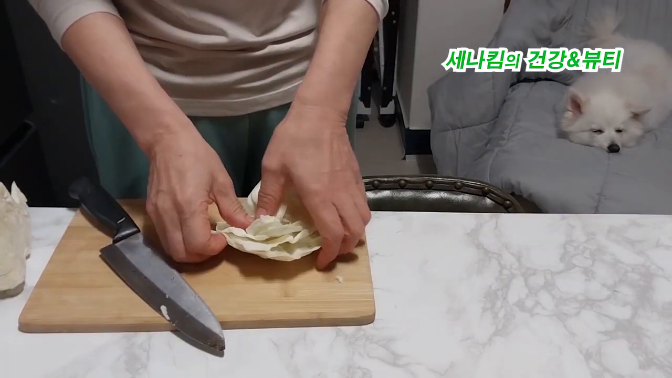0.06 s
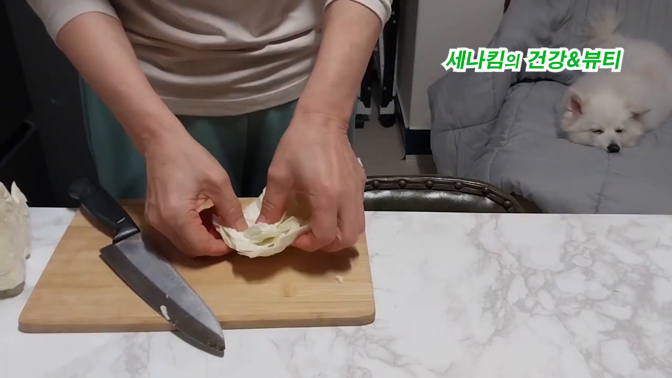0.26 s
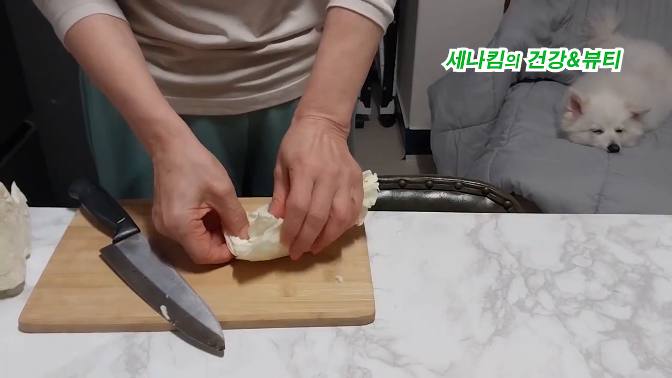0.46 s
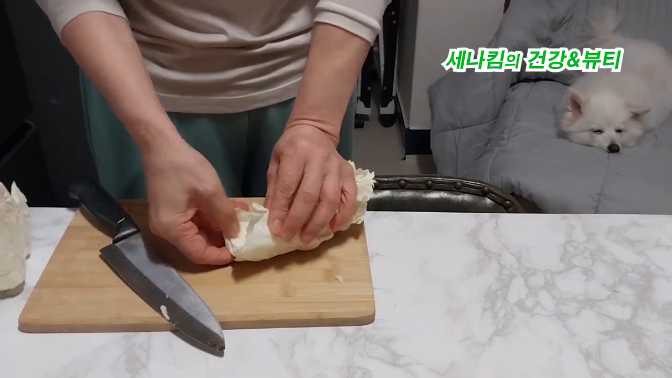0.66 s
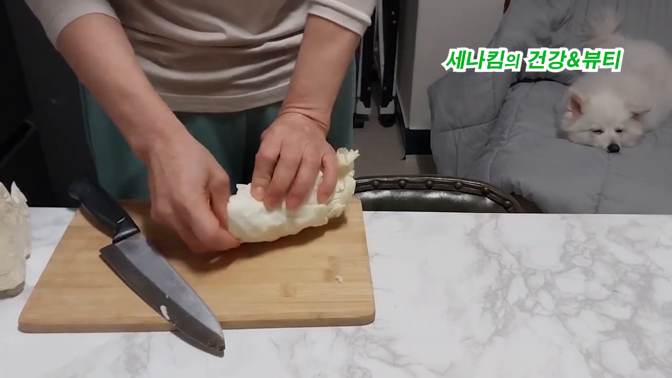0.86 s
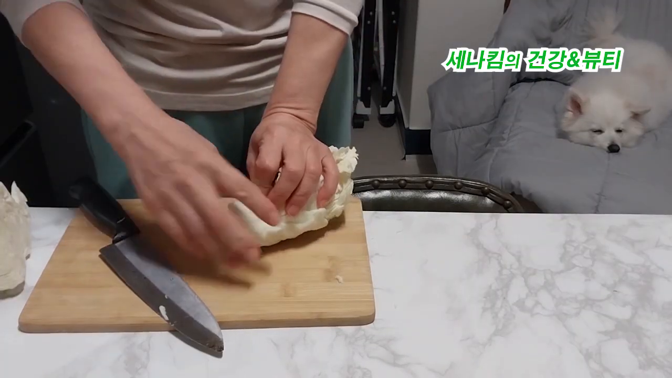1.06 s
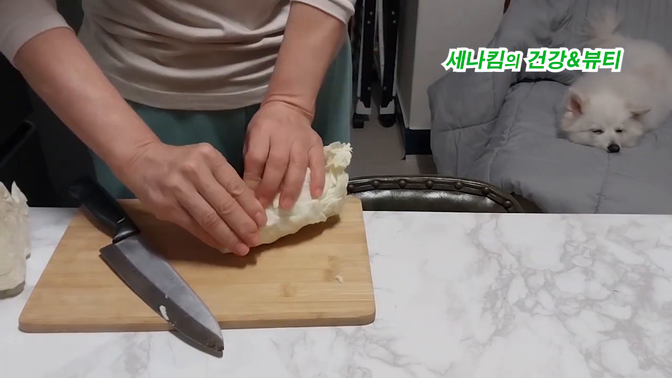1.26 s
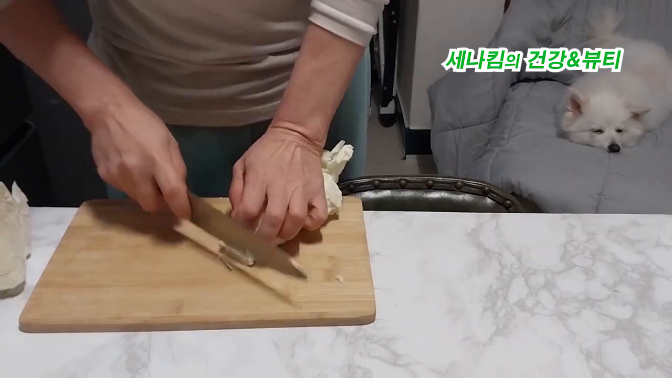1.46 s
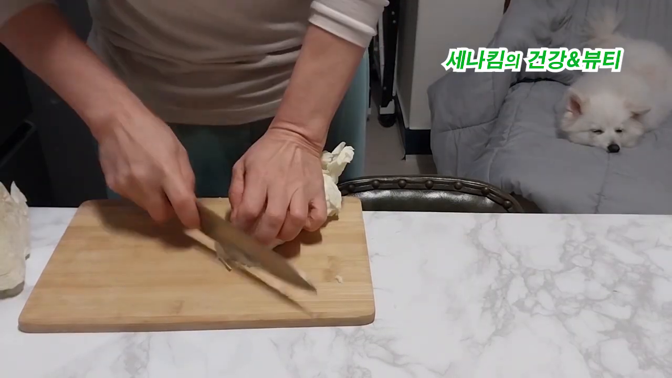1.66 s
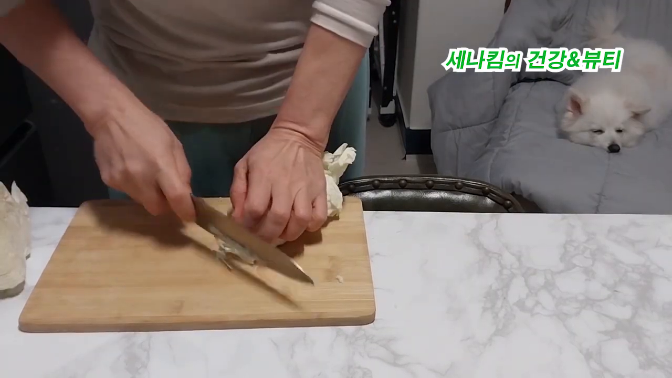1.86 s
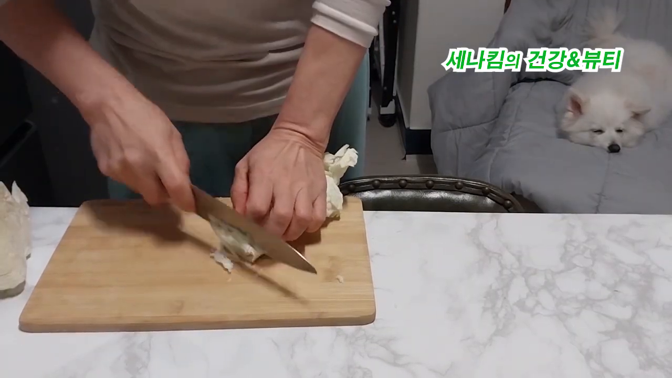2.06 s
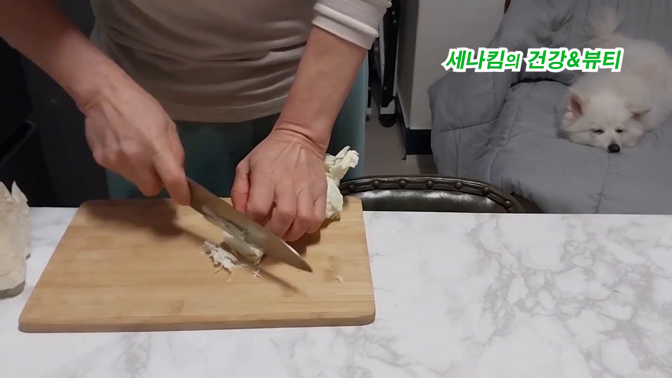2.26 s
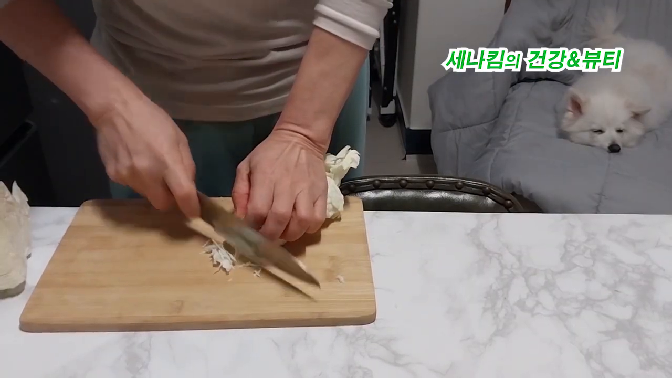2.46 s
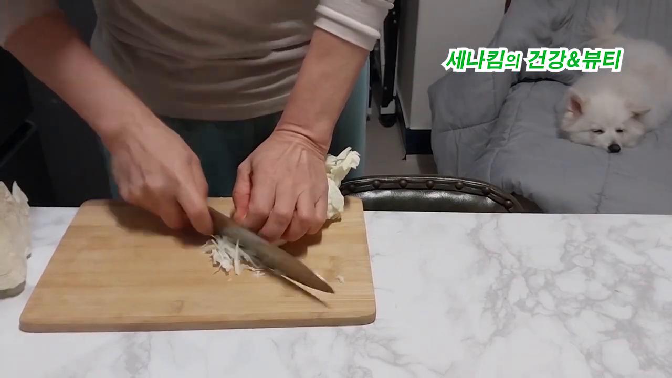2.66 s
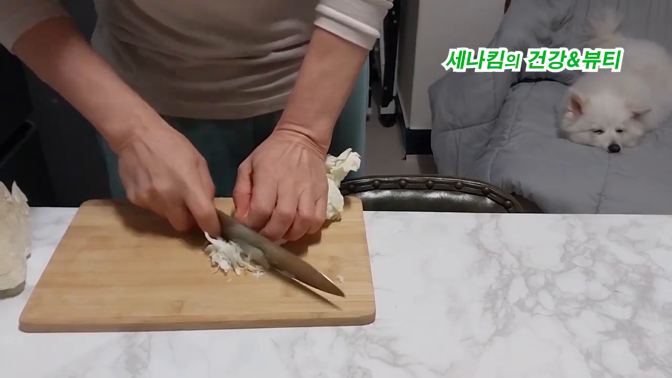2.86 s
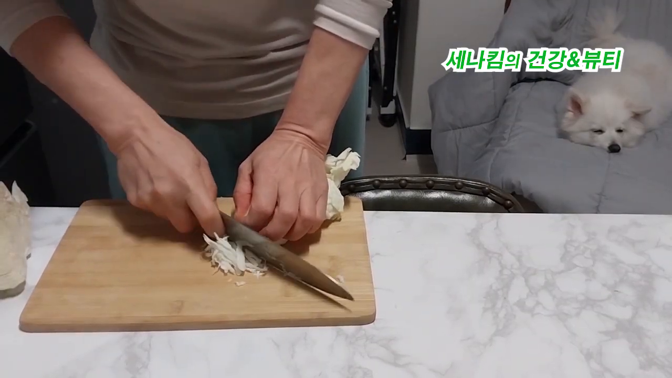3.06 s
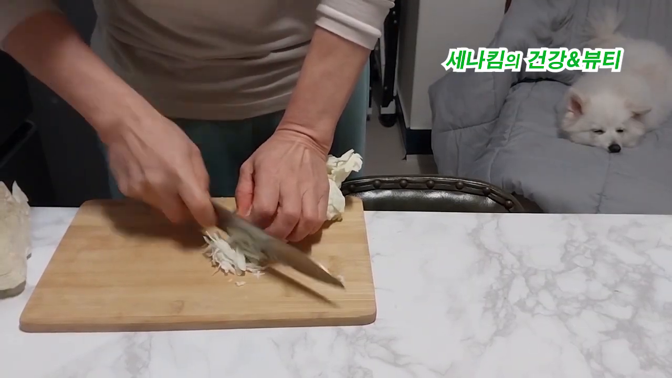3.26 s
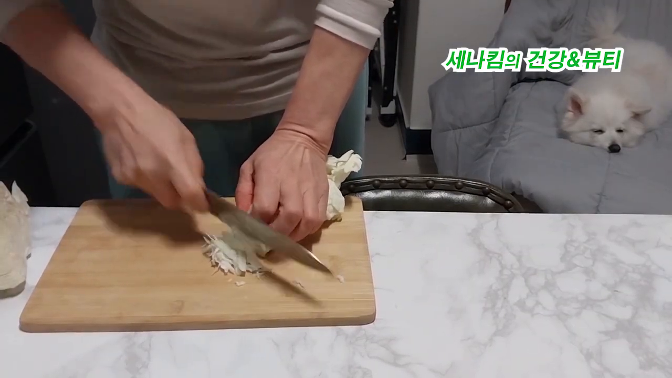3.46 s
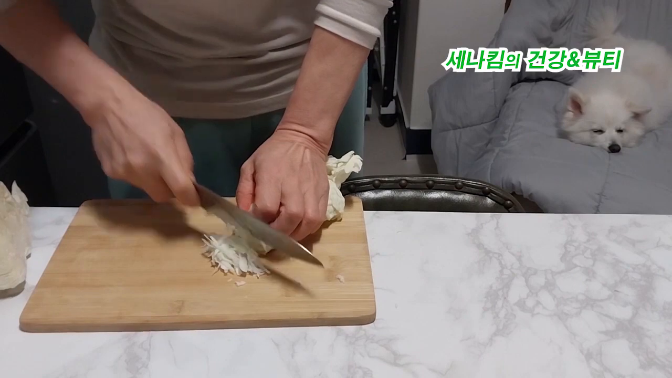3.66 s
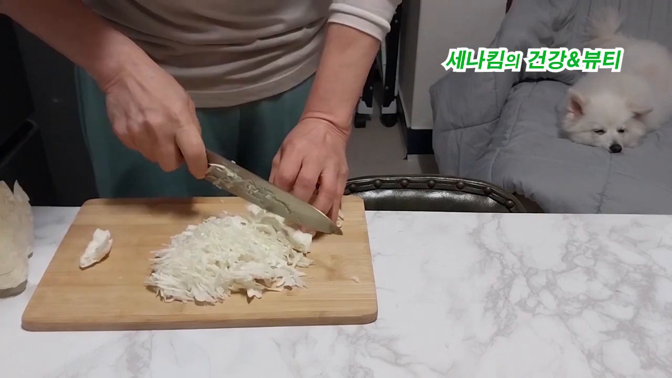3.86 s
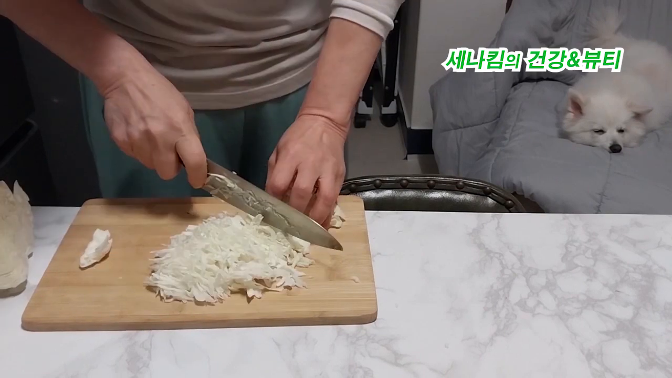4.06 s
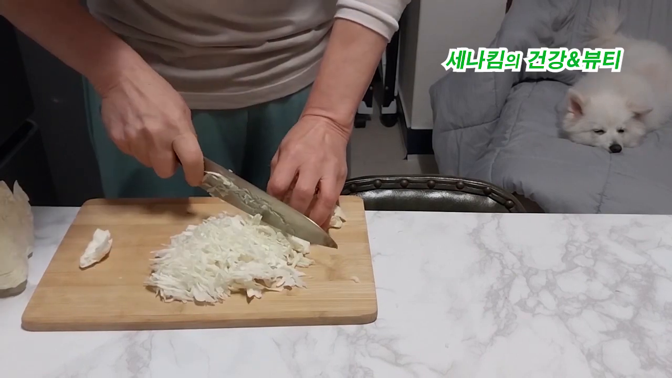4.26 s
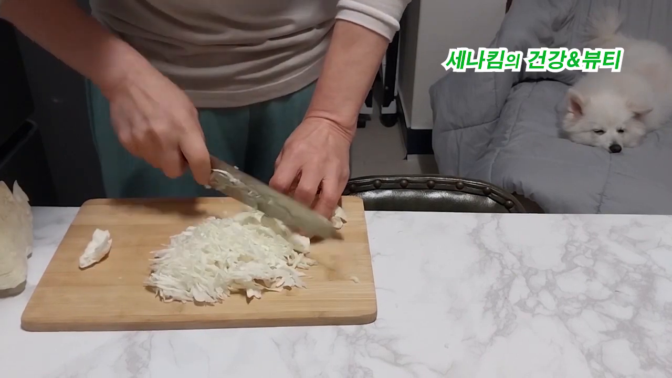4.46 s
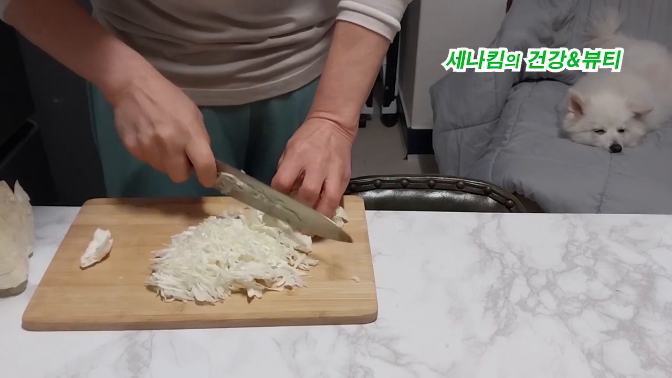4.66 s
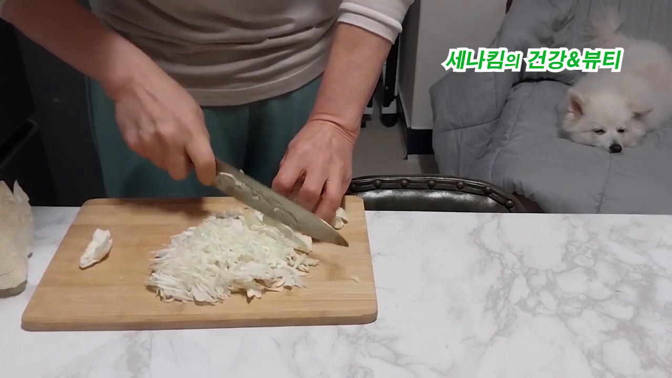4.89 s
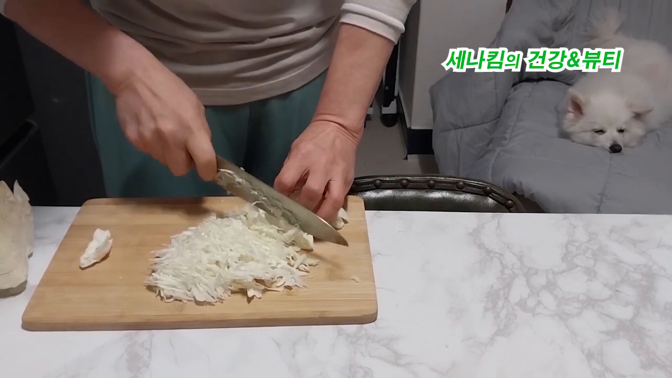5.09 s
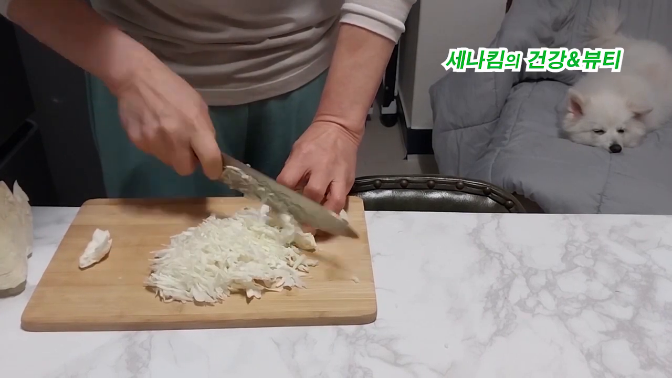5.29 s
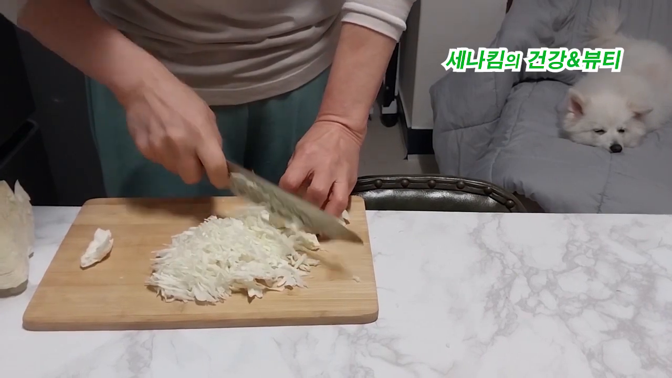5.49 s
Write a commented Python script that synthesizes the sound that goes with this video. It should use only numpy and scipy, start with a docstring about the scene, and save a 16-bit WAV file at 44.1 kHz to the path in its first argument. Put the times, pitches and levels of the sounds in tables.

```python
"""A chef's knife shreds cabbage on a wooden board, close to a stereo pair in a small kitchen.
The leaves are first rolled up: noisy fractures rustle, ribs snap, and handling gives rasps and pitched ticks.
Each stroke then crunches through the roll as growing crackle and knocks on the board as damped modes.
An appliance hums all along, as coloured noise and wavering tones; after a skip to a later moment a motor
is already running, droning and whining as partials of a steadily rising pitch."""
import sys
import numpy as np
from scipy import signal
from scipy.fft import rfft, irfft, next_fast_len
from scipy.io import wavfile

SR = 44100
rng = np.random.default_rng(int(sys.argv[2]) if len(sys.argv) > 2 else 0)


def to_wav(sig):
    """Store sig (one row per channel, or 1-D mono) as 16-bit WAV at the path in sys.argv[1].

    Samples outside -1..1 are clipped; the rate is SR.
    """
    pcm = np.clip(np.atleast_2d(sig), -1, 1) * 32767
    pcm = np.round(pcm).astype(np.int16)
    wavfile.write(sys.argv[1], SR, pcm.T)  # frames by channels


N = 243982
TIME = np.arange(N) / SR
AGE = TIME[:SR // 4]   # seconds since a blow

# Low rush of the appliance. Each row: frequency in Hz, relative density in dB per Hz.
RUSH_SPECTRUM = [(25, -24.5), (60, -20.5), (110, -1), (250, -4), (400, -3), (510, -5.5), (620, -14.5),
                 (1000, -27), (2000, -32.5), (5000, -50), (16000, -55)]
# Level of that rush. Each row: time in seconds, level in dB.
RUSH_LEVEL = [(0, -65), (1.45, -64.5), (1.6, -59), (3.85, -62.5), (3.95, -55.5), (4.4, -57), (5.53, -55)]
# Steady tones of the appliance. Each row: frequency in Hz, relative level in dB.
HUM_TONES = [(220.7, -79.5), (328.4, -70.5), (382.2, -72), (436.0, -77.5), (495.3, -73.5)]
# Leaves rubbing as they are rolled. Each row: hardest push in seconds, relative level in dB, length in seconds.
RUBS = [(.005, -55, 0.16), (0.125, -52.5, 0.055), (0.205, -65.5, 0.54), (0.392, -58, 0.056),
        (0.459, -56.5, 0.11), (0.663, -62, 0.028), (0.747, -51.5, 0.092), (0.924, -48, 0.27),
        (1.025, -56, 0.045), (1.253, -50, 0.16), (1.391, -48, 0.13), (1.458, -50, 0.062)]
# Colour of rubbing leaves. Each row: frequency in Hz, relative density in dB per Hz.
RUSTLE_SPECTRUM = [(530, -5.5), (900, -16), (1100, -9), (1570, -16.5), (1850, -13), (4010, -11),
                   (4520, -11), (7960, -2.5), (16000, -1.5)]
# Leaf ribs snapping. Each row: start in seconds, relative peak in dB.
SNAPS = [(.126, -48.5), (0.624, -39), (.652, -19.5), (0.691, -25), (0.916, -45), (0.9818, -40.5),
         (1.384, -45), (1.441, -41), (2.7176, -31), (3.44, -28.5), (3.826, -25.5), (4.157, -47.5),
         (5.4139, -37)]
# Colour of a snapping rib. Each row: frequency in Hz, relative density in dB per Hz.
SNAP_SPECTRUM = [(240, -36), (400, -5.5), (460, -18.5), (893, -5.5), (1460, -10), (2320, -4.5),
                 (6050, -9.5), (12700, 2.5), (16000, -13.5)]
# Short rasps and pitched ticks from handling the leaves. Each row: start in seconds, relative level in dB,
# pitch in Hz, length in seconds.
RASPS = [(0.082, -70, 1930, 0.03), (0.135, -55.5, 7150, 0.014), (0.23, -68.5, 6600, 0.022),
         (0.8, -55, 4500, 0.019), (0.897, -59.5, 3600, 0.066), (1.069, -65, 2060, 0.034),
         (1.235, -67, 3800, 0.052), (1.422, -59, 3450, 0.028), (1.482, -58, 4000, 0.0087),
         (1.528, -56.5, 1840, 0.0089)]
# Knife strokes. Each row: contact in seconds, relative knock level in dB, pitch of the knock in Hz,
# hardness of the contact in dB, relative crunch level in dB, time spent in the leaves in seconds.
STROKES = [(1.6723, -6.5, 2130, -2, -46, 0.021), (1.8722, -10, 1775, -10, -42.5, 0.035),
           (2.0561, -4.5, 2056, -3.5, -46, 0.055), (2.2357, -4, 2026, -8, -41, .031),
           (2.4037, -9, 2090, 4.5, -43.5, 0.025), (2.5752, -6.5, 2050, -4.5, -42.5, .031),
           (2.7481, -20.5, 1790, -8.5, -45, 0.031), (2.9328, -6, 2060, -2, -42, 0.032),
           (3.1061, -7.5, 1990, 3, -43.5, 0.032), (3.2893, -6.5, 2070, -3, -42.5, 0.035),
           (3.469, -6.5, 2050, 1.5, -41, 0.039), (3.6622, -8, 2250, 1.5, -39.5, 0.029),
           (3.847, -7, 2104, 2.5, -41, 0.026), (4.405, -6, 2213, -1, -41, 0.031),
           (4.627, -5.5, 2290, 1, -46.5, 0.044), (4.829, -10, 2290, 6, -50, 0.044),
           (5.0374, -10, 2110, 0, -43, 0.04), (5.2479, -14, 2250, -1.5, -39.5, .034),
           (5.469, -12.5, 2320, -1.5, -40.5, .049)]
# Leaf cells bursting under the edge. Each row: frequency in Hz, relative density in dB per Hz.
CELL_SPECTRUM = [(100, -15.5), (500, 3.5), (850, -8.5), (1400, -12.5), (2000, -17), (3000, -2.5),
                 (4500, -9.5), (7000, -1), (11000, -2), (16000, 1)]
# Short modes of blade on wood, at the usual pitch. Each row: frequency in Hz, relative level in dB,
# time to fall 60 dB in seconds.
KNOCK_MODES = [(514, -23, 0.0096), (1190, -16, 0.018), (1628, 1.5, 0.006), (2544, 6, 0.0025),
               (3570, 2.5, 0.0032), (4537, -0.5, 0.0017)]
# Modes of board and blade that ring on. Each row: frequency in Hz, relative level in dB.
RING_MODES = [(215, -21), (520, -19), (1082, -11), (1534, -6), (1700, -6.5), (1870, -2.5), (2050, -4.5),
              (2260, -2), (2437, -3), (2616, -8), (3058, -10), (3202, -7), (3332, -10), (3641, -10),
              (3862, -9), (4043, -11), (4470, -10.5), (4890, -6.5)]
# Wash of worktop and kitchen after a knock. Each row: frequency in Hz, relative density in dB per Hz.
WASH_SPECTRUM = [(40, -30), (120, -17), (480, -14), (780, -20), (1100, -11), (1350, -12), (1650, -3),
                 (2300, 0), (2850, -7), (4200, -6), (4950, -5), (5600, -14), (10000, -21), (16000, -25)]
# Partials of the motor's drone. Each row: multiple of the pitch, relative level in dB.
MOTOR_PARTIALS = [(1, 0), (2, -11)]
# Loudness of the motor. Each row: time in seconds, drone level in dB, whine level in dB.
MOTOR_LEVEL = [(3.92, -52.5, -72), (4.17, -48.5, -54.5), (4.55, -56, -65), (4.86, -48.5, -64.5),
               (5.25, -55, -61), (5.53, -57.5, -52)]

KITCHEN_T60_S, BASS_T60_S, WASH_BUILD_S = 0.12, 0.22, .003
WALL_ECHO_S, WALL_ECHO_DB = .0056, -5.5
USUAL_PITCH_HZ = 2090
BOARD_T60_S, RING_SPREAD_DB = .105, 2.6
CRACK_DB, CRACK_BAND_HZ = 1, (3100, 10000)
# a cleaner contact gains top-end sheen and sets the board ringing more: dB per dB of hardness
SHEEN_PER_HARDNESS, RING_PER_HARDNESS = 1, 0.4
AFTER_RING_DB = -16   # ring and wash, relative to the knock
# the knife works its way to the right: left minus right at the first stroke, and its drift
PAN_DB, PAN_DB_PER_S = -1.04, -0.04
SKIP_S = 3.918   # the scene skips ahead to a later moment: earlier rings stop, a motor is already running
MOTOR_HZ, MOTOR_RISE_HZ_PER_S = 101.0, 8.6   # pitch at the skip, and its rise
WHINE_RATIO = 4.42   # pitch of a geared part, relative to the motor
CUTOFF_HZ = 16000


def from_db(db):
    """Decibels to gain."""
    return 10 ** (np.asarray(db) / 20)


def rms_one(x):
    """Scale to unit rms."""
    return x / np.sqrt(np.mean(x ** 2) + 1e-20)


def in_time(rows):
    """Each column of a curve at every sample."""
    s, *columns = np.transpose(rows)
    return [np.interp(TIME, s, column) for column in columns]


def add(out, s, sound):
    """Mix a sound in from time s on."""
    i = int(round(s * SR))
    out[..., i:i + sound.shape[-1]] += sound[..., :out.shape[-1] - i]


def cut(x, hz, kind):
    """Second-order low- or high-pass."""
    sos = signal.butter(2, min(hz, .45 * SR), kind, fs=SR, output="sos")
    return signal.sosfilt(sos, x)


def shelf(x, hz, db):
    """Lift or lower everything above a frequency."""
    b, a = signal.butter(1, min(hz, .45 * SR), "high", fs=SR)
    return x + (from_db(db) - 1) * signal.lfilter(b, a, x)


def colour(x, spectrum):
    """Shape a signal by a spectrum, keeping the power of white noise."""
    hz, db = np.transpose(spectrum)
    bins = np.maximum(np.fft.rfftfreq(x.shape[-1], 1 / SR), 1)
    gain = rms_one(from_db(np.interp(np.log(bins), np.log(hz), db)))
    return irfft(rfft(x) * gain, x.shape[-1])


def waver(rate):
    """Slow chance movement around zero with about unit spread, at a rate in knots per second."""
    knots = rng.standard_normal(400)
    return np.interp(TIME * rate, np.arange(len(knots)), knots)


def grains(per_s, spread_db):
    """Tiny fractures at random moments, of very uneven size; rms 1."""
    sizes = from_db(spread_db * np.minimum(rng.exponential(1, N), 4)) * rng.choice([-1, 1], N)
    return rms_one(sizes * (rng.random(N) < per_s / SR))


def diffuse(size, apart_hz=1900, bass_side=0.37):
    """Noise from all round: much alike at both microphones in the bass, unrelated in the treble."""
    mid, side = rfft(rng.standard_normal((2, size)))
    hz = np.maximum(np.fft.rfftfreq(size, 1 / SR), 1)
    side_share = np.clip(bass_side ** 2 + .5 / (1 + (apart_hz / hz) ** 4), 0, .5)
    return irfft(np.sqrt(1 - side_share) * mid + np.sqrt(side_share) * side * [[1], [-1]], size)


def direct(x, lag_s=.000042):
    """Sound from the board reaches the right microphone a moment later."""
    size = next_fast_len(len(x) + SR // 100, real=True)
    delay = np.exp(-2j * np.pi * np.fft.rfftfreq(size, 1 / SR) * lag_s)
    right = irfft(rfft(x, size) * delay, size)[:len(x)]
    return np.array([x, right])


def tail(spectrum, hold_s=0.0075, bass_hz=600):
    """Dense reflections build up, hold for a moment and die, the bass last."""
    noise = colour(diffuse(len(AGE)), spectrum)
    bass = cut(noise, bass_hz, "low")
    fading = np.maximum(AGE - hold_s, 0)
    quick = from_db(-60 * fading / KITCHEN_T60_S)
    slow = from_db(-60 * fading / BASS_T60_S)
    return (noise * quick + bass * (slow - quick)) * (1 - np.exp(-AGE / WASH_BUILD_S))


def kitchen(x, wet_db, dull_db=-4):
    """A small sound on the board with its slightly duller reflections."""
    response = tail([(3000, 0.019), (16000, dull_db)])
    response /= np.sqrt(np.sum(response ** 2) / 2)
    reflections = signal.fftconvolve(x[None], response, axes=1)[:, :N]
    return direct(x) + from_db(wet_db) * reflections


def struck(modes, pitch, detune, spread_db):
    """Damped modes of alternating sign, their pitch and strength varying by chance from blow to blow."""
    hz, db, t60 = np.transpose(modes)[:, :, None]
    shift, strength = rng.standard_normal((2, len(modes), 1))
    signs = (-1) ** np.arange(len(modes))[:, None]
    swing = np.sin(2 * np.pi * hz * pitch * (1 + detune * shift) * AGE)
    decay = from_db(db + spread_db * strength - 60 * AGE / t60)
    return np.sum(signs * decay * swing, axis=0)


def background(hum_db=3.5, hiss_db=-81):
    """Soft low rush of an appliance with a few wavering tones, over a faint even hiss."""
    level_db, = in_time(RUSH_LEVEL)
    rush = from_db(level_db) * colour(diffuse(N), RUSH_SPECTRUM)
    tones = np.zeros(N)
    for hz, db in HUM_TONES:
        level = from_db(db + hum_db + 2 * waver(6.1))
        tones += level * np.sin(2 * np.pi * hz * TIME + .5 * waver(5.6))
    # the tones follow half the rush's change in dB
    tones = from_db(.5 * (level_db - level_db[0])) * tones
    return rush + tones + from_db(hiss_db) * diffuse(N)


def leaves(rustle_db=-3, snap_db=-4, snap_s=0.0013, fits_db=3, wet_db=-3):
    """Leaves rub in fits and starts as they are rolled, and now and then a rib snaps."""
    swell_db = 23.5   # rise to each push from half a length away, and fall after it
    push = np.zeros(N)
    for s, db, length_s in RUBS:
        push += from_db(db - swell_db * np.abs(TIME - s) / (length_s / 2))
    fits = from_db(fits_db * waver(70)) * grains(per_s=2300, spread_db=5)
    rubbing = from_db(rustle_db) * push * fits
    breaks = np.zeros(N)
    for s, peak_db in SNAPS:
        burst = np.exp(-AGE / snap_s) * rng.standard_normal(len(AGE))
        add(breaks, s, from_db(peak_db + snap_db) * burst)
    return kitchen(colour(rubbing, RUSTLE_SPECTRUM) + colour(breaks, SNAP_SPECTRUM), wet_db)


def rasps_and_ticks(sharpness=3.9):
    """Handling the leaves gives short bursts of random impulses, each resonating around one pitch."""
    out = np.zeros(N)
    for s, db, hz, length_s in RASPS:
        impulses = rng.standard_normal(len(AGE)) * (rng.random(len(AGE)) < 1500 / SR)   # 1500 a second
        b, a = signal.iirpeak(hz, sharpness, fs=SR)
        rasp = rms_one(signal.lfilter(b, a, impulses))
        add(out, s, from_db(db) * rasp * np.sin(np.pi * np.minimum(AGE / length_s, 1)))
    return kitchen(out, wet_db=-6)


def crunch(crunch_db=4, entry_db=-17, release_s=0.0045, press_db=14, press_s=0.005):
    """Cells burst ever louder as the blade sinks; in the last layers the board takes up the crackle."""
    bite, press = np.zeros(N), np.zeros(N)
    for s, _, _, _, level_db, lead_s in STROKES:
        before, after = np.clip(s - TIME, 0, 2 * lead_s), np.maximum(TIME - s, 0)
        force = from_db(level_db) * np.exp(-after / release_s) * (before < 2 * lead_s)
        bite += force * from_db(entry_db * (before / lead_s) ** 2)
        press += force * np.exp(-before / press_s)
    bursts, crackle = grains(per_s=2200, spread_db=4.5), grains(per_s=2000, spread_db=2.5)
    cells = colour(from_db(crunch_db) * bite * bursts, CELL_SPECTRUM)
    wood = colour(from_db(press_db) * press * crackle, WASH_SPECTRUM)
    return kitchen(shelf(cells, 12000, -3.5) + cut(wood, 3000, "low"), wet_db=-1.0)


def knock(pitch, low_hz=280, rebound_db=-5.0, rebound_s=0.000691, crack_s=.0008):
    """Brief modes of hard wood, with the crack of the steel edge scattering differently to each side."""
    wood = struck(KNOCK_MODES, pitch, detune=.015, spread_db=1.2)
    wood = cut(-wood, low_hz, "high")
    wood /= np.sqrt(np.mean(wood[:SR * 3 // 1000] ** 2))   # rms 1 over the first 3 ms
    crack = diffuse(len(AGE)) * np.exp(-AGE / crack_s)
    crack = cut(cut(crack, CRACK_BAND_HZ[0], "high"), CRACK_BAND_HZ[1], "low")
    out = direct(wood) + from_db(CRACK_DB) * crack
    # the bending wave returns inverted from the board's edge, further to the left
    add(out, rebound_s, -from_db(rebound_db) * direct(wood, lag_s=.00009))
    return out


def knocks(knock_db=-8.5, wash_db=-1, ring_db=-4):
    """The edge hits the board: a hard knock, one wall echo, ringing wood and steel, and the room's wash."""
    edge_hz, edge_db, sheen_hz, sheen_db, wash_top_db = 3000, 3.0, 10000, -3, -9
    out = np.zeros((2, N))
    modes = [(hz, db, BOARD_T60_S) for hz, db in RING_MODES]
    for s, hit_db, hz, hard_db, _, _ in STROKES:
        left_minus_right_db = PAN_DB + PAN_DB_PER_S * (s - STROKES[0][0])
        force = from_db(hit_db) * from_db(left_minus_right_db * np.array([[.5], [-.5]]))
        hit = from_db(knock_db) * knock(hz / USUAL_PITCH_HZ)
        ring = direct(struck(modes, 1, detune=.002, spread_db=RING_SPREAD_DB), lag_s=.0001)
        ring *= from_db(ring_db) * (1 - np.exp(-AGE / WASH_BUILD_S))
        wash = from_db(wash_db) * shelf(tail(WASH_SPECTRUM), sheen_hz, wash_top_db)
        blow = hit + from_db(AFTER_RING_DB + RING_PER_HARDNESS * hard_db) * (ring + wash)
        # a cleaner contact of steel on wood is brighter
        blow = shelf(blow, edge_hz, edge_db + hard_db)
        blow = shelf(blow, sheen_hz, sheen_db + SHEEN_PER_HARDNESS * hard_db)
        sounding = (s > SKIP_S) | (s + AGE < SKIP_S)
        add(out, s, force * blow * sounding)
        echo = from_db(WALL_ECHO_DB) * cut(hit, 3000, "low")
        add(out, s + WALL_ECHO_S, force * echo)
    return out


def motor(wobble=0.0049, drone_flutter_db=0.4, upper_flutter_db=5.0):
    """A motor drones and whines as it steadily gains speed; higher partials flutter more."""
    drone_db, whine_db = in_time(MOTOR_LEVEL)
    hz = MOTOR_HZ + MOTOR_RISE_HZ_PER_S * (TIME - SKIP_S)
    turn = 2 * np.pi * np.cumsum(hz * (1 + wobble * waver(31))) / SR
    drone = np.zeros(N)
    for multiple, db in MOTOR_PARTIALS:
        flutter_db = drone_flutter_db if multiple == 1 else upper_flutter_db
        drone += from_db(drone_db + db + flutter_db * waver(7.5)) * np.sin(multiple * turn)
    whine = from_db(whine_db + upper_flutter_db * waver(27)) * np.sin(WHINE_RATIO * turn)
    fade_in = np.clip((TIME - SKIP_S) / 0.0081, 0, 1)
    return np.sqrt(2) * (drone + whine) * fade_in   # root 2: a sine's rms to its peak


def scene():
    """Knife on the board, leaves and hum a little to the right, and the motor in the middle."""
    knife = knocks() + crunch()
    rightward = (leaves() + rasps_and_ticks() + background()) * from_db([[-1.2], [1.2]])
    return knife + rightward + motor()


def record(dry):
    """The hardest knocks are rounded off near full scale; the top is cut."""
    rounded = .92 * np.tanh(dry / .92)
    lowpass = signal.ellip(12, .1, 90, CUTOFF_HZ, fs=SR, output="sos")
    return signal.sosfilt(lowpass, rounded)


dry = scene()
out = record(dry)
to_wav(out)
```